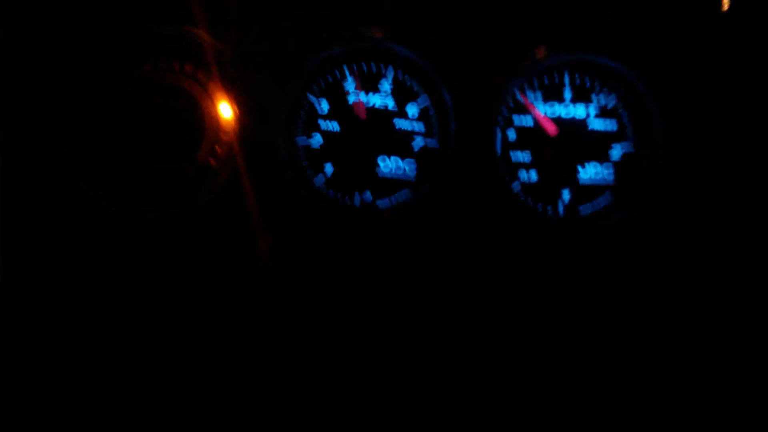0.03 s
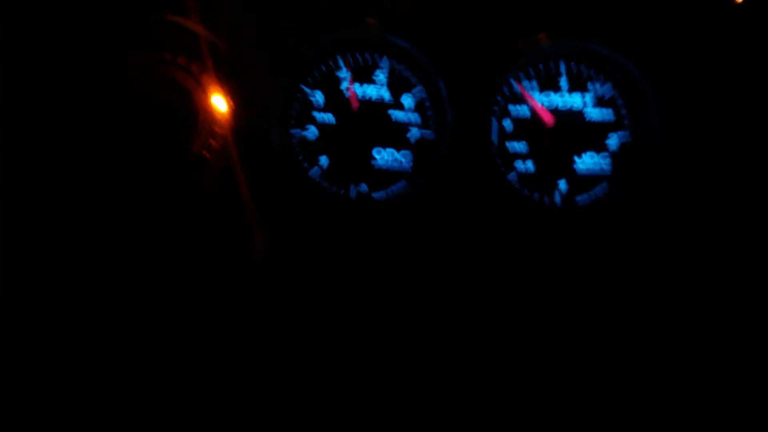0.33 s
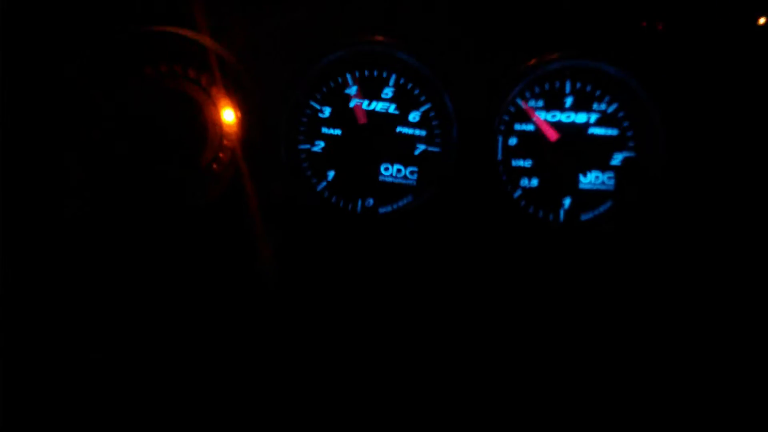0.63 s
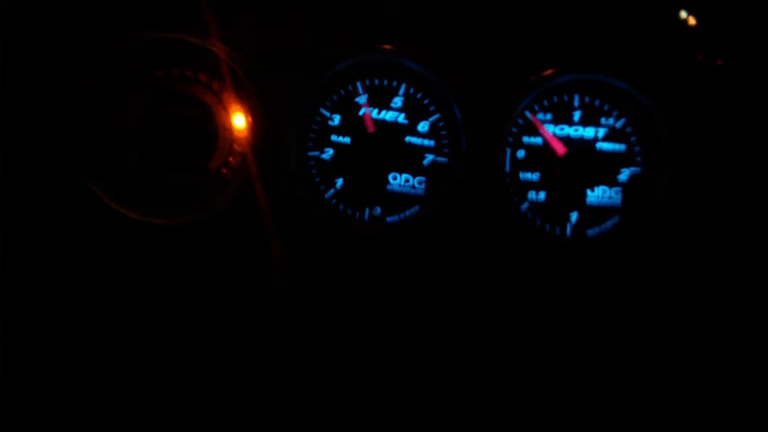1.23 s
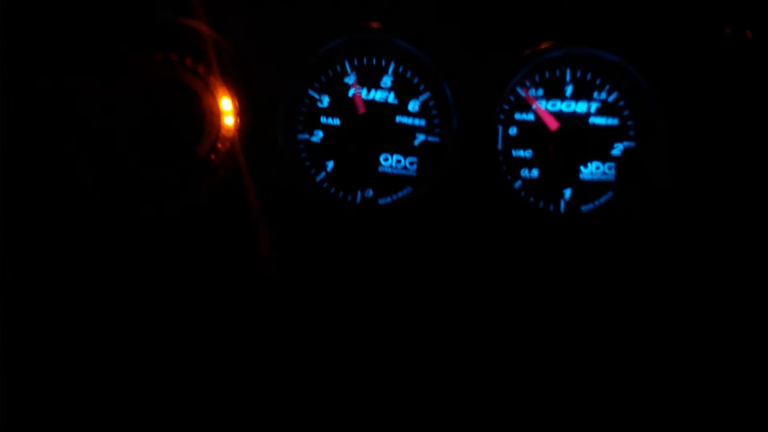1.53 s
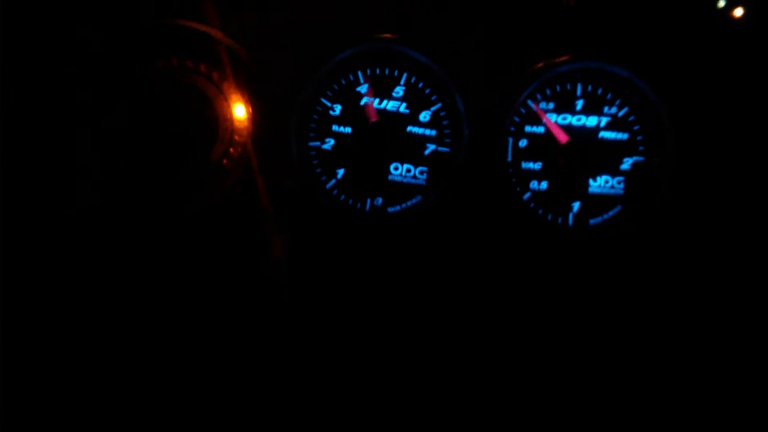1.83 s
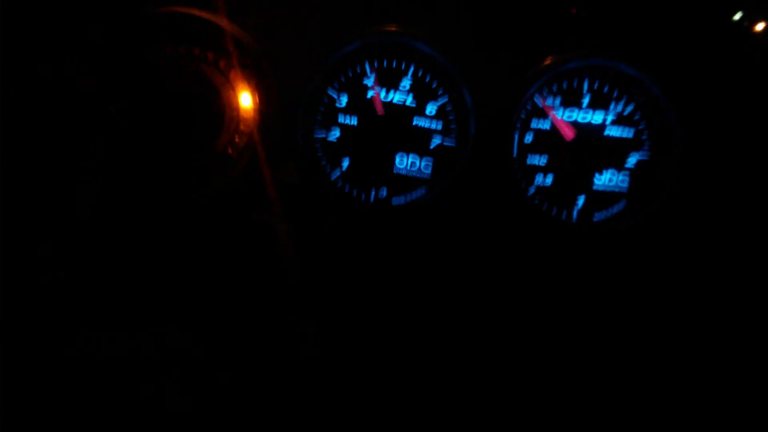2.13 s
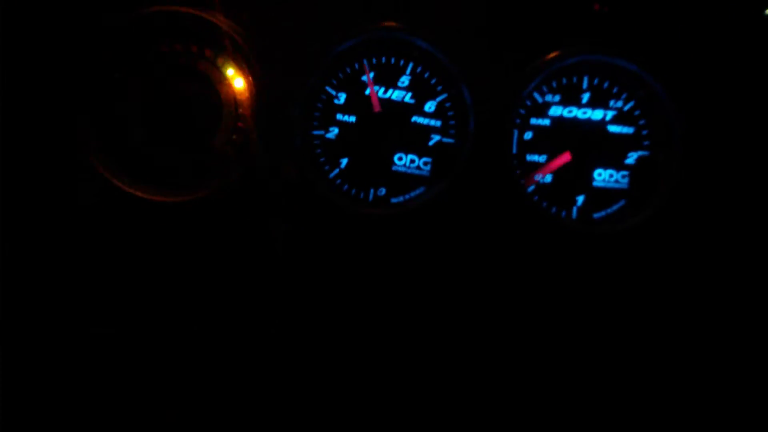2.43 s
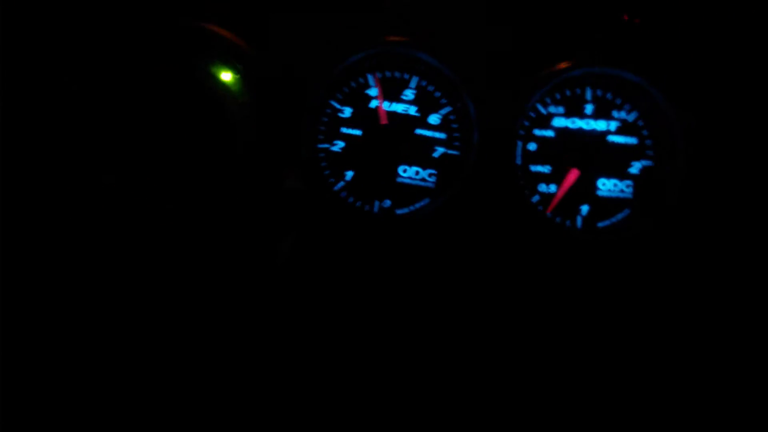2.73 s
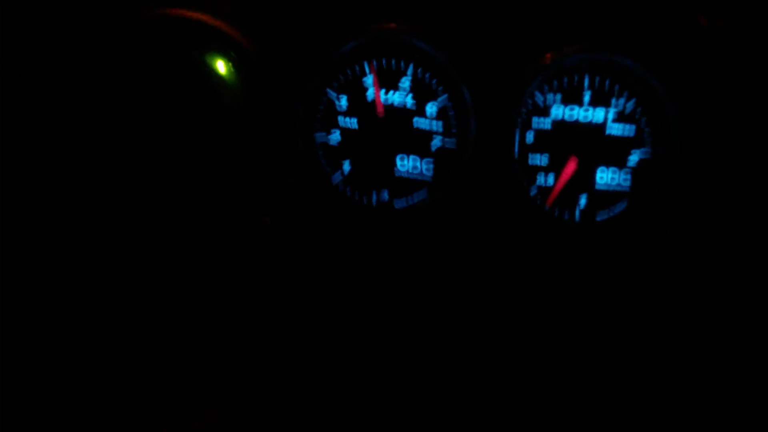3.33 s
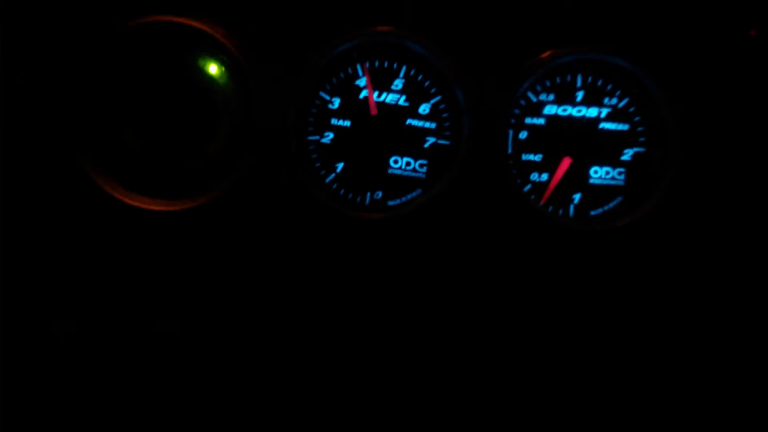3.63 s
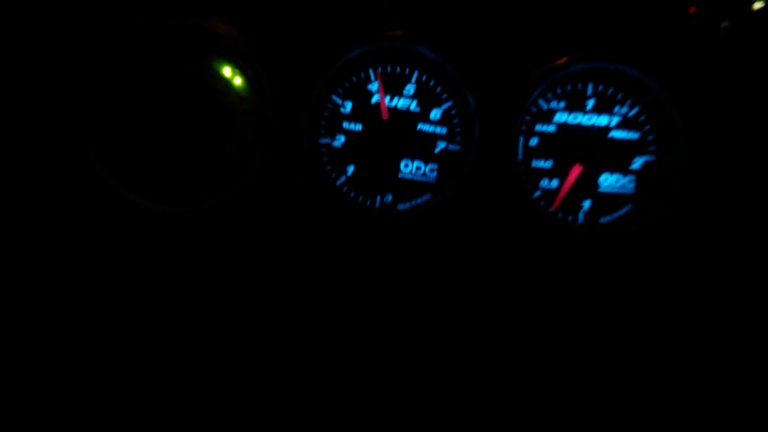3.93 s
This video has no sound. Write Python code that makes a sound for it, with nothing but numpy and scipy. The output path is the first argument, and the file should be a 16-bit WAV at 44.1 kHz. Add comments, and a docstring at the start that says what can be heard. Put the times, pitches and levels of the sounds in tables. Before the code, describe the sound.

A turbocharged car engine booms at a nearly steady pitch inside the cabin, with a rough roar, road rumble and a faint, high hissing whine. The overloaded microphone distorts and briefly chokes, mostly around 1 second. At about 2.4 seconds the throttle lifts and the blow-off valve vents a hiss with a sinking whistle, strongest near 2.7 seconds and fading by 3.4. The boom continues until 4 seconds.

```python
"""A booming exhaust over a rough roar, heard inside a turbocharged car pulling under load.
The boom sits at the engine's firing rate; above it the turbo hisses and whines, below it the road rumbles.
The throttle lifts and the blow-off valve vents, its whistle sinking as the pressure drains.
The boom overloads the microphone, which flattens peaks, chops the hiss and at times chokes briefly."""
import sys
import numpy as np
from scipy import signal
from scipy.fft import rfft, irfft
from scipy.io import wavfile
from scipy.ndimage import uniform_filter1d

SR = 44100
rng = np.random.default_rng(int(sys.argv[2]) if len(sys.argv) > 2 else 0)


def persist_wave(psi):
    """Save psi, clipped to +-1, as 16-bit WAV."""
    counts = np.round(np.clip(psi, -1, 1) * 32767).astype(np.int16)
    wavfile.write(sys.argv[1], SR, np.atleast_2d(counts).T)


N = 176400
T = np.arange(N) / SR


def from_db(db):
    """Decibels to gain."""
    return 10 ** (np.asarray(db) / 20)


def rms_one(x):
    """Scale to unit rms."""
    return x / np.sqrt(np.mean(x ** 2) + 1e-20)


def envelope(rows, column=1):
    """One column of timed breakpoints, joined by straight lines."""
    columns = np.transpose(rows)
    return np.interp(T, columns[0], columns[column])


def drift(rate_hz):
    """Random wander of spread 1, mostly slower than rate_hz."""
    hz = np.arange(N // 2 + 1) * SR / N
    return rms_one(irfft(rfft(rng.standard_normal(N)) / (1 + (hz / rate_hz) ** 2), N))


def noise(colour):
    """Noise shaped by an EQ curve, falling steeply beyond both ends; rms 1."""
    hz = np.arange(1, N // 2 + 2) * SR / N
    points_hz, db = np.transpose(colour)
    gain = from_db(np.interp(np.log(hz), np.log(points_hz), db))
    skirts = np.minimum(hz / points_hz[0], 1) ** 2 * np.minimum(points_hz[-1] / hz, 1) ** 2
    return rms_one(irfft(rfft(rng.standard_normal(N)) * gain * skirts, N))


def phase_of(hz):
    """Running phase of a steady or moving frequency."""
    return 2 * np.pi * np.cumsum(hz * np.ones(N)) / SR


def resonance(hz, width_hz):
    """The ring of a steady or moving resonance excited by turbulence; rms 1."""
    phase = phase_of(hz)
    return rms_one(drift(width_hz / 2) * np.cos(phase) + drift(width_hz / 2) * np.sin(phase))


def burst(at_s, half_length_s, hz, width_hz):
    """A band of noise that swells and fades in a bell curve."""
    return np.exp(-((T - at_s) / half_length_s) ** 2) * resonance(hz, width_hz)


# Envelope of the exhaust boom in the cabin, before overdrive: t/s, level/dB
BOOM_LEVEL = [(0.0, -7.5), (0.09, -6), (0.12, -23.5), (0.15, -3.5), (0.2, -10.5), (0.31, -5.5), (0.38, -6),
              (0.44, -24.5), (0.48, -6), (0.59, -5.5), (0.61, -14.5), (0.65, -9), (0.67, -8), (0.71, -4.5),
              (0.85, -8.5), (0.87, -52.5), (0.9, -8), (0.98, -8), (1.0, -7), (1.04, -6), (1.08, -31.5),
              (1.12, -4.5), (1.16, -4.5), (1.25, -5), (1.28, -20), (1.31, -6.5), (1.37, -5.5), (1.57, -19),
              (1.67, -6), (1.71, -4), (1.78, -11.5), (1.83, -7.5), (1.93, -5.5), (1.98, -10), (2.0, -16),
              (2.1, -6.5), (2.16, -6.5), (2.19, -33), (2.22, -14.5), (2.42, -6), (2.53, -6), (2.63, -9.5),
              (2.66, -6), (2.8, -10.5), (2.87, -31), (2.91, -7.5), (3.16, -8), (3.2, -23), (3.29, -4.5),
              (3.31, -23), (3.38, -15.5), (3.41, -7), (3.48, -10), (3.62, -6), (3.72, -18), (3.8, -6.5),
              (3.88, -6.5), (3.92, -12), (3.98, -8.5), (4.0, -11.5)]


def exhaust_boom(firing_hz):
    """A sine at the firing rate, pushed harder when loud; also returns the ducking gain it sets."""
    overdrive_from_db, overdrive_db_per_db, duck_db_per_db = -8.5, 0.43, 0.15
    level_db = envelope(BOOM_LEVEL)
    overdrive_db = overdrive_db_per_db * np.maximum(level_db - overdrive_from_db, 0)
    boom = rms_one(np.sin(phase_of(firing_hz))) * from_db(level_db + overdrive_db + 0.13)
    duck = from_db(-duck_db_per_db * np.clip(level_db - np.median(level_db), -6, 6))
    return boom, duck


# Weaker engine orders: multiple of the firing rate, level/dB
ENGINE_ORDERS = [(.5, -31), (1.5, -23), (2, -22), (3, -27.5)]


def engine_orders(firing_hz, effort_db):
    """Rough partials that track the firing rate and swell with the roar."""
    partials = sum(from_db(db) * resonance(k * firing_hz, width_hz=17.4) for k, db in ENGINE_ORDERS)
    return from_db(effort_db - effort_db.mean()) * partials


# Colour of the roar on the throttle: f/Hz, level/dB
LOADED_COLOUR = [(200, -7.5), (300, 1), (420, -1), (560, -3.5), (850, -6.5), (1400, -14.5), (2000, -24.5),
                 (2800, -42.5), (5000, -38.5)]
# Colour of the roar off the throttle: f/Hz, level/dB
COASTING_COLOUR = [(200, -15), (300, 3.5), (420, 0.5), (540, -9), (850, -2.5), (1050, -9.5), (1400, -11.5),
                   (2000, -21.5), (2800, -36), (5000, -38.5)]


def roar(firing_hz, effort_db, load, dropouts):
    """Engine and road noise that throbs with each firing and changes colour as the throttle lifts."""
    bed = np.sqrt(load) * noise(LOADED_COLOUR)
    bed += np.sqrt(1 - load) * from_db(-1.5) * noise(COASTING_COLOUR)
    flutter_db = 1.57 * drift(51)
    throb = 1 + 0.26 * np.cos(phase_of(firing_hz))
    return bed * from_db(effort_db + 3.5 + flutter_db - 2.5 * dropouts) * throb


# Envelope of the cabin drone: t/s, level/dB
CABIN_LEVEL = [(0.0, -36), (0.04, -6), (0.17, -24.5), (0.21, -6.5), (0.24, -19.5), (0.88, -12), (0.92, -51),
               (1.0, -6.5), (1.05, -18.5), (1.54, -19), (1.58, -10), (1.67, -33), (1.84, -12), (1.92, -31),
               (2.0, -5.5), (2.04, -19), (2.17, -14.5), (2.48, -30.5), (3.22, -17.5), (3.27, -27),
               (3.89, -23.5), (4.0, -18.5)]
# Cabin modes: f/Hz, width/Hz, level/dB
CABIN_MODES = [(263.8, 41, 0.5), (299, 52, -1.5), (406.2, 65, -11.5)]


def cabin_drone():
    """The engine drives the cabin's fixed resonances."""
    modes = sum(from_db(db) * resonance(hz, width_hz) for hz, width_hz, db in CABIN_MODES)
    return from_db(envelope(CABIN_LEVEL)) * modes


# Firing rate of the engine: t/s, f/Hz
FIRING_RATE = [(0, 128.5), (.3, 132.8), (.55, 133.4), (.75, 132.8), (1.2, 133.3), (1.4, 135), (1.7, 134.1),
               (2.15, 136), (2.45, 136.7), (2.75, 134.4), (3.1, 136.1), (3.55, 131.3), (4, 130.9)]
# Envelope shared by the roar and the orders: t/s, level/dB
EFFORT = [(0.0, -30), (0.02, -17), (0.04, -20.5), (0.57, -23), (1.01, -22.5), (1.04, -23), (1.31, -22),
          (1.32, -23.5), (1.63, -20), (1.64, -21.5), (2.38, -22), (2.41, -22), (2.72, -27), (3.1, -25.5),
          (3.33, -30), (3.34, -25.5), (3.39, -29.5), (3.88, -27), (3.93, -36), (3.95, -26), (3.99, -33),
          (4.0, -24)]


def engine(load, dropouts):
    """One wavering firing rate drives boom, orders and roar; drone and roar duck under the boom."""
    firing_hz = envelope(FIRING_RATE) + 2.023 * drift(8.2)
    effort_db = envelope(EFFORT)
    boom, duck = exhaust_boom(firing_hz)
    orders = engine_orders(firing_hz, effort_db)
    return boom + orders + duck * (cabin_drone() + roar(firing_hz, effort_db, load, dropouts))


# Colour of the escaping air: f/Hz, level/dB
JET_COLOUR = [(1200, -17), (2300, -13.5), (3200, -16), (4300, -16), (5500, -11), (7000, 2.5), (8000, -1),
              (9600, 2), (10500, -5.5), (12500, -8.5), (15500, -12.5)]


def air_jet(age_s):
    """Escaping air, losing its top end as the pressure drains."""
    top_hz, dulling_per_s = 9060, 2.3
    jet = noise(JET_COLOUR)
    body = signal.sosfiltfilt(signal.butter(2, top_hz, fs=SR, output="sos"), jet)
    return from_db(1.5) * (body + (jet - body) * np.exp(-dulling_per_s * age_s))


# Glide of the valve's whistle: t/s, f/Hz, relative level/dB
WHISTLE_GLIDE = [(2.54, 6150, -25), (2.58, 6020, 8), (2.62, 5850, 1), (2.7, 5420, -3), (2.76, 5050, -5),
                 (2.84, 4650, -9.5), (2.9, 4400, -14), (2.97, 3900, -13), (3.08, 3753, -12),
                 (3.18, 3644, -6), (3.35, 3434, 1), (3.5, 3392, -0.5), (3.62, 3400, -8), (3.76, 3360, 5),
                 (3.8, 3363, -5), (4, 3370, -14)]
# Upper valve resonances: ratio to the whistle, width/Hz, level/dB at opening, 0.3 s on and 0.7 s on
VALVE_MODES = [(1.701, 1200, -14, -10, -1.5), (1.951, 1300, 2, -21, -26.5)]


def valve_whistle(age_s, opened):
    """A breathy, sinking whistle; upper resonances come in as the valve opens and sink with it."""
    whistle_hz = envelope(WHISTLE_GLIDE)
    level_db = envelope(WHISTLE_GLIDE, column=2) + 1.5 * drift(33)
    whistle = from_db(level_db) * resonance(whistle_hz, width_hz=488)
    for ratio, width_hz, *levels_db in VALVE_MODES:
        mode_db = np.interp(age_s, [0, .3, .7], levels_db)
        whistle += opened * from_db(mode_db) * resonance(ratio * whistle_hz, width_hz)
    return whistle


# Envelope of the air flow through the blow-off valve: t/s, level/dB
VENT_FLOW = [(2.36, -52), (2.4, -31.5), (2.43, -40), (2.47, -29.5), (2.51, -40.5), (2.53, -26),
             (2.565, -20.5), (2.583, -20), (2.64, -16), (2.69, -17.5), (2.735, -24.5), (2.78, -17.5),
             (2.86, -22), (2.93, -24.5), (3.05, -28.5), (3.25, -37.5), (3.42, -49.5), (3.7, -55),
             (3.87, -60), (4, -48)]


def blow_off(dropouts):
    """The valve chuffs open and vents; dropouts of the overloaded microphone chop the early hiss."""
    open_s, opening_s = 2.6, 0.086
    chop_until_s, chop_fade_s, chop_db = 2.84, .1, 13.5
    age_s = np.maximum(T - open_s, 0)
    opened = np.clip(1 + (T - open_s) / opening_s, 0, 1)
    air = air_jet(age_s) + valve_whistle(age_s, opened)
    air *= from_db(envelope(VENT_FLOW) + 1.5 * drift(75))
    chuff = from_db(-33.5) * burst(at_s=2.393, half_length_s=0.011, hz=4800, width_hz=1370)
    overloaded = np.clip(.5 - (T - chop_until_s) / chop_fade_s, 0, 1)
    chop = from_db(-chop_db * overloaded * (dropouts - dropouts.mean()))
    return from_db(-5) * chop * windscreen_echo(pipe_ring(air + chuff))


# Resonances of the intake plumbing: f/Hz, gain
PIPE_MODES = [(4944, .9), (5470, 1.6), (5756, 1.3), (5821, .8), (5981, .6), (6025, .6), (6493, 1.0),
              (7070, .6)]


def pipe_ring(air, width_hz=12):
    """The plumbing adds narrow, fixed peaks to the rushing air."""
    return air + sum(gain * signal.lfilter(*signal.iirpeak(hz, hz / width_hz, fs=SR), air)
                     for hz, gain in PIPE_MODES)


def windscreen_echo(air, delay_s=.002976, gain=.96, cutoff_hz=8000):
    """A strong short echo, as off the windscreen, hollows the hiss."""
    echo = signal.sosfilt(signal.butter(2, cutoff_hz, fs=SR, output="sos"), air)
    return air + gain * np.interp(T - delay_s, T, echo)


# Envelope of the intake hiss, wavering under load and falling after the lift: t/s, level/dB
INTAKE_LEVEL = [(0, -41.5), (.24, -42.5), (.31, -42), (.43, -41), (.52, -42.5), (.83, -41.5), (.91, -45),
                (1.03, -37.5), (1.2, -42), (1.3, -40.5), (1.58, -40.5), (1.68, -42), (1.78, -42.5),
                (1.9, -46), (2.04, -37.5), (2.14, -44.5), (2.24, -40), (2.4, -44), (2.6, -59), (3.3, -66),
                (4, -63)]
# Colour of the intake hiss: f/Hz, level/dB
INTAKE_COLOUR = [(2000, -7), (3500, -17.5), (6000, 0.5), (8500, 5.5), (10200, 0.5), (11500, 0),
                 (15500, -6.5)]


def turbo(dropouts):
    """Intake hiss and a fading whine that creeps up with shaft speed, chopped by microphone dropouts."""
    whine_hz, rise_hz_per_s = 9790, 130
    fade_from_s, fade_db_per_s = 1.5, 6
    fade_db = fade_db_per_s * np.maximum(T - fade_from_s, 0)
    whine = resonance(whine_hz + rise_hz_per_s * T, width_hz=420)
    whine *= from_db(1.5 + 2.2 * drift(25) - fade_db)
    level_db = envelope(INTAKE_LEVEL) + 0.52 * drift(40) - 17 * dropouts
    return from_db(level_db) * (noise(INTAKE_COLOUR) + whine)


# Colour of the road rumble: f/Hz, level/dB
RUMBLE_COLOUR = [(15, -19), (27, -13), (42, -9), (60, -17), (85, -6.5), (120, -2), (165, 0.5), (220, -12),
                 (300, -18.5), (500, -29)]


def road():
    """Steady low rumble through the body, and one thud."""
    thud = burst(at_s=2.27, half_length_s=0.045, hz=78, width_hz=25)
    return from_db(-12) * noise(RUMBLE_COLOUR) + from_db(-10) * thud


def mic_dropouts(rate_hz=180, threshold=0.88):
    """Brief random gaps, as from a saturating microphone: near 1 inside a gap, near 0 between."""
    return (1 + np.tanh(3 * (drift(rate_hz) - threshold))) / 2


def scene():
    """The mix at the dashboard; microphone dropouts chop roar and hiss under load, then the vent."""
    lift_s, lift_fade_s = 2.404, .15  # the throttle closes
    load = np.clip(.5 - (T - lift_s) / lift_fade_s, 0, 1)
    dropouts = mic_dropouts()
    vent = blow_off(dropouts)
    return (engine(load, load * dropouts) + vent + road() + turbo(load * dropouts))[None]


def limiter(x, limit_db=1.32, attack_s=0.0016, release_db_per_s=260):
    """Pulls the gain down on peaks above the limit and recovers quickly."""
    over_db = np.maximum(20 * np.log10(np.abs(x) + 1e-9) - limit_db, 0)
    release_db = release_db_per_s * T
    held_db = np.maximum.accumulate(over_db + release_db, axis=-1) - release_db
    return x * from_db(-uniform_filter1d(held_db, int(2 * attack_s * SR)))


# Chokes of the overloaded microphone: t/s, length/s, depth/dB
MIC_CHOKES = [(.006, 0.0025, 27), (0.059, 0.0031, 46), (.08, 0.0036, 14), (.127, 0.0042, 31),
              (.23, 0.0034, 34), (0.391, 0.0069, 6), (.514, 0.0057, 18), (0.603, 0.0043, 10),
              (.623, 0.0052, 17.5), (0.864, 0.0051, 23), (1.004, 0.0043, 30), (1.031, .007, 19),
              (1.054, 0.0068, 26), (1.072, 0.017, 12), (1.098, 0.011, 21.5), (1.119, 0.0073, 17),
              (1.595, 0.0036, -1), (2.199, .005, 30), (2.741, 0.0069, 5), (3.697, 0.0086, 11.5)]


def record(dry):
    """The overloaded microphone chain: limiter, soft clip, brief timed chokes and a steep high cut."""
    ceiling, knee, cutoff_hz = 0.68, 8.4, 15650
    limited = limiter(dry)
    clipped = limited / (1 + np.abs(limited / ceiling) ** knee) ** (1 / knee)
    choke_db = sum(depth_db * np.exp(-np.minimum(np.abs(2 * (T - at_s) / length_s), 2) ** 6)
                   for at_s, length_s, depth_db in MIC_CHOKES)
    high_cut = signal.ellip(12, .1, 80, cutoff_hz, fs=SR, output="sos")
    return signal.sosfilt(high_cut, clipped * from_db(-choke_db))


dry = scene()
out = record(dry)
persist_wave(out)
```